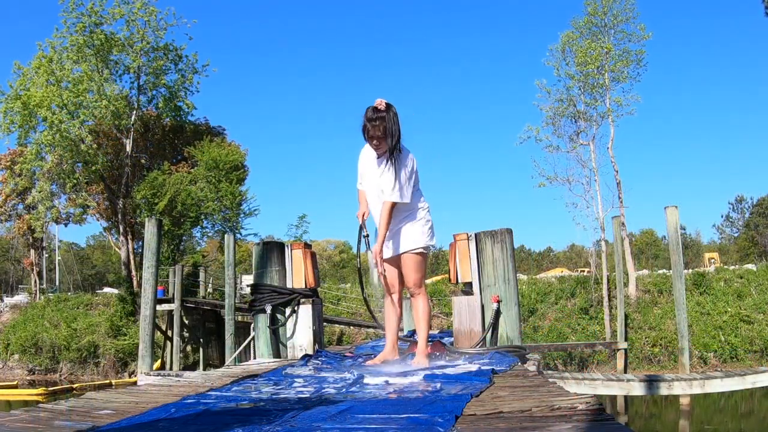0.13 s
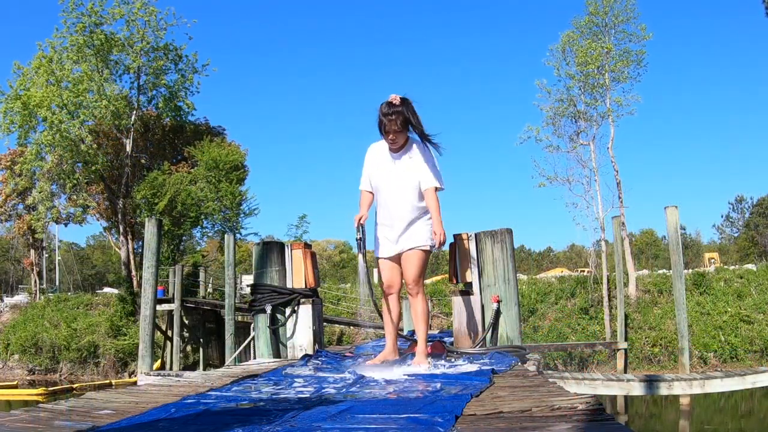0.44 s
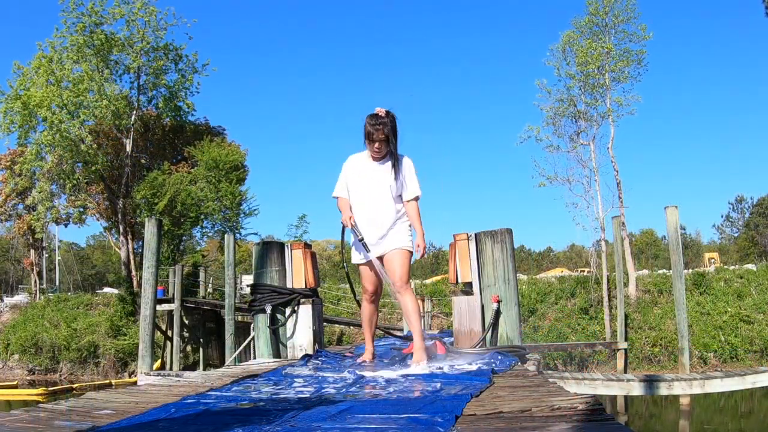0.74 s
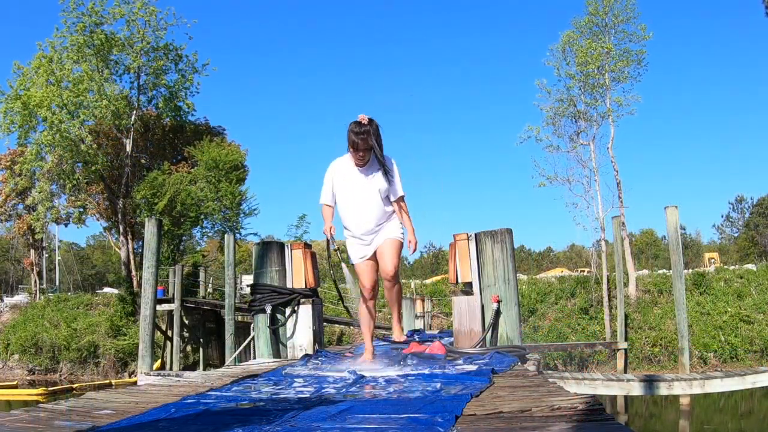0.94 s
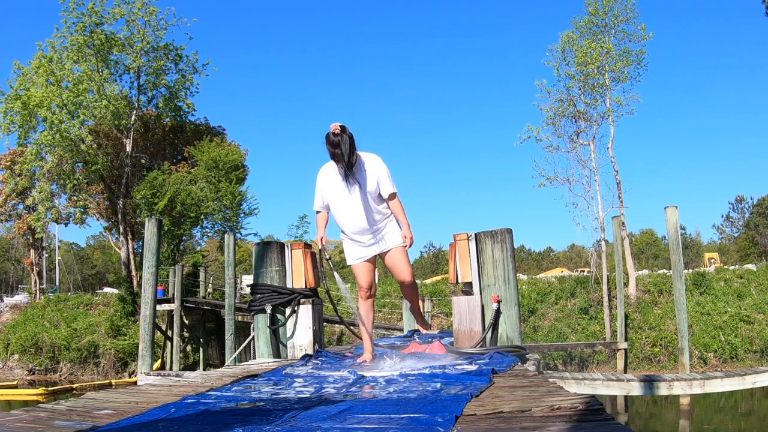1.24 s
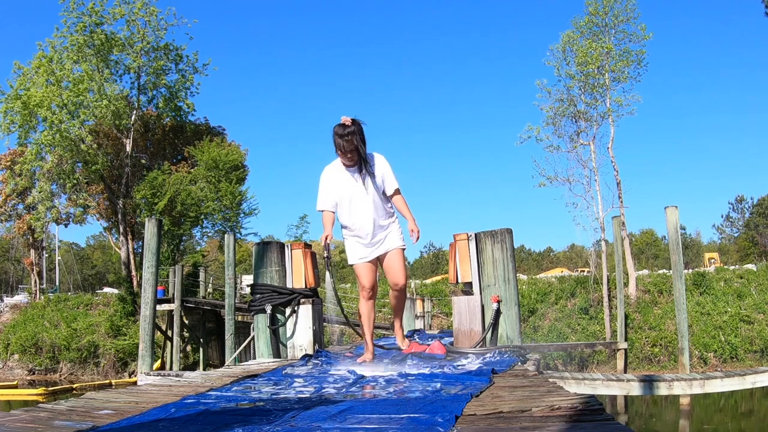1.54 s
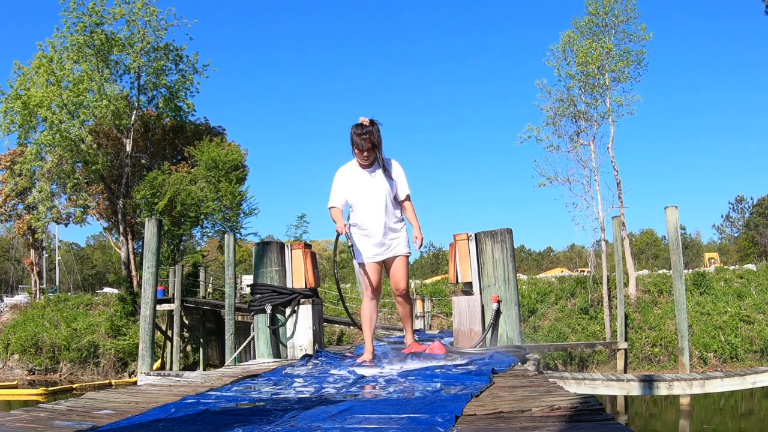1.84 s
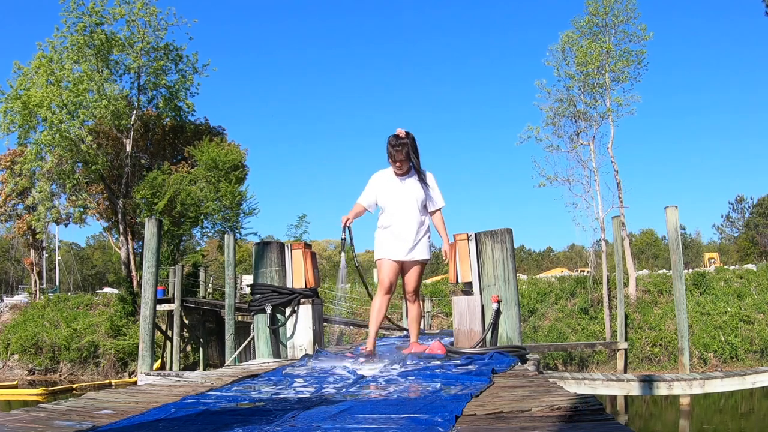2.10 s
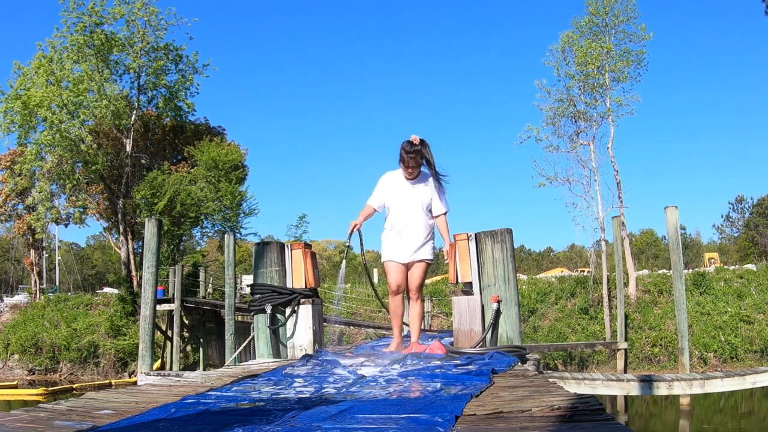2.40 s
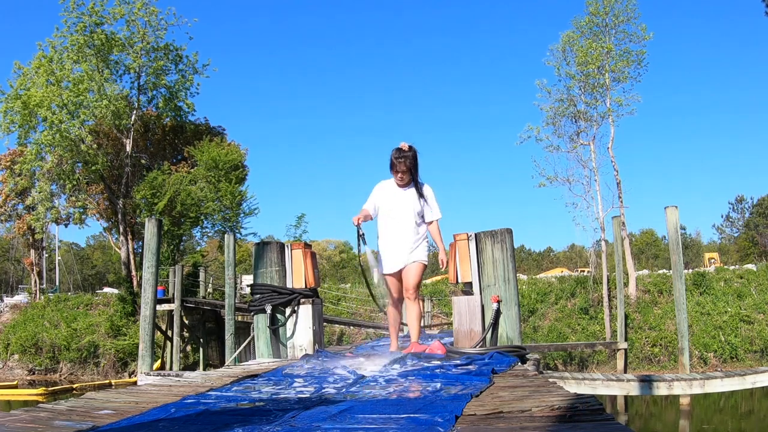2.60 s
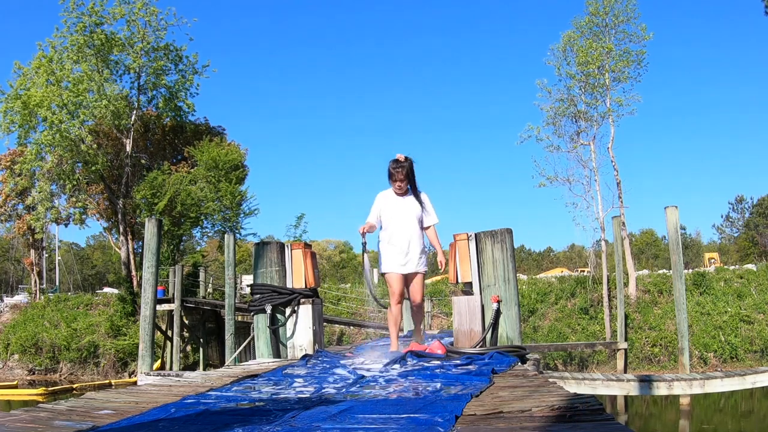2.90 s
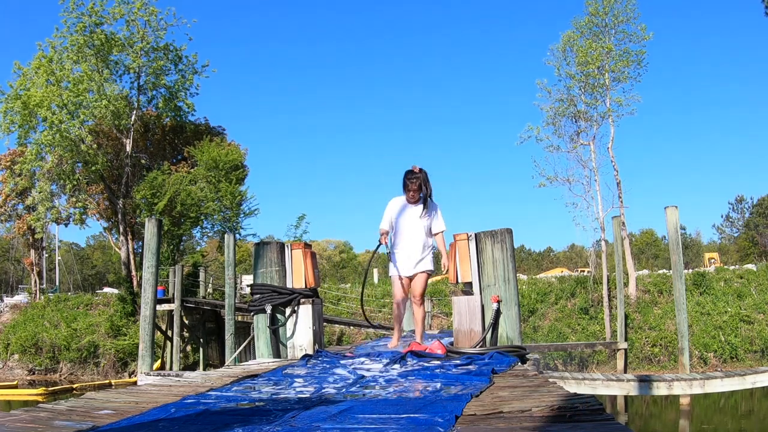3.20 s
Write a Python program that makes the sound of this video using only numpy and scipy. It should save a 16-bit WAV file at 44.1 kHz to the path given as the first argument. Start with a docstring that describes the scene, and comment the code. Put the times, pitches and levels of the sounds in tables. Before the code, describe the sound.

A hose nozzle sprays hard onto a plastic tarp on a wooden dock, a continuous bright, flickering hiss and patter sweeping about, with faint foot thuds and one sharp wet slap late; small stereo camera a few metres away.

```python
"""Hard spray from a hose nozzle sweeps a plastic tarp on a wooden dock: thousands of random drop hits,
split into bands that follow the sweep and flicker. Feet thud as low swelling tones; wet slaps and gurgles
ring a few cycles; a foot scuffs as band-limited noise. Light wind, slow-varying noise, buffets the ports.
Heard a few metres off through the two microphone ports of a small camera lying on the boards."""
import sys
import numpy as np
from scipy import signal
from scipy.fft import rfft, irfft
from scipy.io import wavfile
from scipy.ndimage import uniform_filter1d

SR = 44100
rng = np.random.default_rng(int(sys.argv[2]) if len(sys.argv) > 2 else 0)


def wav_out(sig):
    """Save sig, one row per channel (or a flat mono array), as 16-bit PCM at SR to the path in sys.argv[1]."""
    wavfile.write(sys.argv[1], SR, np.round(np.clip(np.atleast_2d(sig).T, -1, 1) * 32767).astype(np.int16))


N = 147735  # samples

# the sweeping spray, before its flicker: (time [s], patter level [dB],
# drumming against patter [dB], fine hiss against patter [dB])
SPRAY_SWEEP = [(0.0, -33, -6, -12), (0.02, -37, -3.5, -9), (0.04, -36, -4.5, -10), (0.21, -31.5, -12, -10),
               (0.28, -29.5, -16, -9.5), (0.32, -34.5, -13.5, -10), (0.43, -36.5, -9, -9),
               (0.46, -34.5, -13, -9), (0.5, -38.5, -11, -4), (0.512, -31.5, -13, -10),
               (0.57, -30.5, -15.5, -9.5), (0.62, -35, -8, -8), (0.64, -32, -11.5, -7.5),
               (0.69, -36.5, -5, -5), (0.72, -31.5, -13, -12), (0.76, -34.5, -5.5, -5),
               (0.77, -32.5, -17, -10), (0.81, -34, -7.5, -9), (0.83, -36.5, -12.5, -3),
               (0.97, -35, -7.5, -9), (1.0, -33.5, -8.5, -3.5), (1.045, -36, -9, -8), (1.075, -32, -12, -9),
               (1.13, -37, -11, -9.5), (1.2, -34, -8.5, -1), (1.23, -36.5, -6, -9), (1.275, -32, -9.5, -12),
               (1.3, -39, -11, -5), (1.32, -33.5, -12, -10), (1.35, -31.5, -9.5, -1),
               (1.39, -34.5, -2, -11), (1.42, -32.5, -13, -10), (1.51, -38.5, -3, -1), (1.55, -30, -13, -9),
               (1.65, -36, -11.5, -10), (1.69, -31.5, -9, -9), (1.73, -35.5, -8, -6.5),
               (1.88, -33.5, -10, -6.5), (1.91, -30, -4, -15), (1.95, -35.5, -10.5, -4),
               (1.98, -32, -9.5, -14), (2.0, -34, -9, -4), (2.09, -36, -8.5, -7), (2.12, -33, -10, -8.5),
               (2.18, -38.5, -10, -2.5), (2.2, -34, -6, -10), (2.24, -36.5, -11, -2.5),
               (2.34, -36.5, -5.5, -6.5), (2.43, -34.5, -11, -3), (2.49, -36.5, -3, -9),
               (2.54, -34.5, -11.5, -8), (2.58, -36, -9, -6), (2.68, -34.5, -11, -5.5),
               (2.73, -38.5, -5, -5.5), (2.81, -35, -4.5, -11), (2.88, -36, -3, -5),
               (2.98, -31.5, -8.5, -13), (3.01, -33.5, -7, -10), (3.045, -39, -4.5, -9),
               (3.065, -48, -13, -5), (3.095, -48.5, -6, -8), (3.125, -39, -8.5, -9), (3.16, -39, -8.5, -7),
               (3.21, -38.5, -5, -8.5), (3.26, -40.5, -2, -12), (3.29, -39, -10, -14), (3.31, -44, -3, -5),
               (3.35, -39.5, -10, -12)]
# low rush of water on sheet and boards, before it follows the sweep: (time [s], level [dB])
LOW_RUSH = [(0.0, -54), (1.5, -51.5), (1.83, -54), (2.06, -50), (2.57, -49.5), (2.99, -53.5), (3.15, -51),
            (3.35, -59)]
# tone of the spray through the camera housing and the boards under it: (frequency [Hz], density [dB per Hz])
SPRAY_COLOUR = [(88, -22), (150, -16), (172, -15.5), (222, -17), (272, -5.5), (330, -9), (413, -8.5),
                (502, -6.5), (699, -10.5), (816, -14), (1160, -7), (1780, -4), (2080, 0.5), (2630, -6),
                (3250, 0.5), (3880, -8.5), (4440, 1.5), (5300, -7), (6070, 0), (7090, -6.5), (7820, -0.5),
                (8450, -7.5), (12500, -10), (13500, -8), (14900, -13), (15800, -15.5)]
# spray that differs between the ports, against the shared spray: (frequency [Hz], level [dB])
PORT_DIFFERENCE = [(200, -12.5), (1800, -13.5), (2400, -3.5), (2900, -15.5), (3700, -2.5), (3900, -10),
                   (4600, -33), (5100, -31), (9800, -31), (11000, -6), (11700, -20), (12600, -5),
                   (13300, -2), (14000, -7), (14700, -13), (15600, -3)]
# gusts on the ports, level of the part common to both: (time [s], level [dB])
WIND_GUSTS = [(0.0, -73), (0.34, -61.5), (0.4, -55), (0.45, -78), (0.58, -69), (0.61, -55), (0.7, -55),
              (0.77, -80), (1.05, -61), (1.12, -81), (1.55, -72), (1.6, -58), (1.68, -56), (1.75, -84),
              (1.99, -76), (2.02, -45), (2.09, -75), (2.53, -73), (2.6, -57), (2.8, -91), (2.92, -62),
              (3.01, -48), (3.05, -75), (3.14, -67), (3.35, -86)]
# tone of the wind rumble: (frequency [Hz], density [dB per Hz])
WIND_COLOUR = [(20, -16), (40, -3), (70, 1), (120, 2), (170, -10), (400, -37)]
# feet on the boards: (start [s], peak level [dB], pitch [Hz], length [s])
FOOT_THUDS = [(0.668, -43, 62, 0.045), (2.015, -37.5, 171.3, 0.044), (2.515, -46.5, 240, 0.025),
              (2.563, -45, 201, 0.023), (2.586, -41, 190, 0.018), (2.94, -45, 60.3, 0.081)]
# wet slaps and gurgles on the sheet: (time of peak [s], peak level [dB], pitch [Hz], ring [cycles])
WET_SLAPS = [(.75, -45, 450, 2), (1.003, -44, 480, 2), (2.09, -44, 620, 3), (2.117, -42, 520, 5),
             (2.27, -41.5, 500, 7), (2.308, -40, 600, 2), (2.448, -42, 550, 2), (3.22, -33, 2380, 12),
             (2.6082, -22, 430, .45), (2.6126, -20, 800, .55)]
# resonances of the right port against the left: (frequency [Hz], width [Hz], level [dB])
RIGHT_RESONANCES = [(900, 1700, 1.5), (2200, 330, 2.5), (2470, 140, -3.5), (3270, 430, 4), (11130, 130, -8),
                    (13200, 3800, 1.5)]
# echo off the boards cancels or lifts the direct sound: (frequency [Hz], width [Hz], level [dB])
BOARD_ECHO = [(3360, 220, 1.5), (6780, 120, -3), (8320, 220, -8.5), (8780, 360, 3.5), (11250, 220, -10),
              (12620, 180, -7), (13950, 200, -5), (11600, 690, 1.5), (14500, 500, 1)]

DROPS_PER_S, DROP_SPREAD_DB = 32000, 1.24  # the spread is the mean of a random extra level
# spread of the random level walks: all bands together, each band at 2 kHz, quick flutter from 2 kHz up
SHARED_DB, OWN_DB, FLUTTER_DB = 0.5, 0.82, 1.95
OWN_TILT = -0.26  # power of pitch: a band's own walk is wider in the bass
RUSH_FOLLOWS = 0.3  # share of the drumming level's changes (in dB) added to the low rush
TOP_STEADY = 0.44  # share of the quick level changes that hiss above 11 kHz ignores
THUD_SIDE_DB = -11  # side part of a thud against its middle
SCUFF_START_S, SCUFF_END_S = 2.57, 2.613
SCUFF_DB, SCUFF_HZ = -33, (190, 1300)  # level at full rise; band
TOP_HZ = 15780  # cut-off of the steep low-pass [Hz]


def undb(db):
    """Turn decibels into an amplitude factor."""
    return 10 ** (np.asarray(db) / 20)


def curve(table, col):
    """Draw one column of a table sample by sample, in straight lines."""
    table = np.array(table)
    return np.interp(np.arange(N) / SR, table[:, 0], table[:, col])


def level(x):
    """Scale to an RMS of 1."""
    return x / np.sqrt(np.mean(x ** 2))


def colour(x, table):
    """Filter through a (frequency [Hz], level [dB]) table with a short causal, minimum-phase response."""
    table = np.array(table)
    hz = np.linspace(1, SR / 2, 2049)
    db = np.interp(np.log(hz), np.log(table[:, 0]), table[:, 1])
    cepstrum = irfft(db * np.log(10) / 20)
    # folding the cepstrum forward in time makes the response causal
    cepstrum[1:2048] *= 2
    cepstrum[2049:] = 0
    response = irfft(np.exp(rfft(cepstrum)))
    return signal.fftconvolve(x, response)[:N]


def walk(rate):
    """Wander between random levels held 1 / rate seconds and smoothed twice; RMS 1."""
    hold = int(SR / rate)
    steps = np.repeat(rng.standard_normal(N // hold + 1), hold)
    smooth = uniform_filter1d(uniform_filter1d(steps, hold), hold)
    return level(smooth[:N])


def bands(x, edges):
    """Split a sound into overlapping bands that sum to it."""
    spectrum = rfft(x)
    log_hz = np.log(np.arange(N // 2 + 1) * SR / N + 1)
    return [irfft(spectrum * np.interp(log_hz, np.log(edges), row), N) for row in np.eye(len(edges))]


def drops():
    """Drops of uneven size land at random moments, each a one-sample hit."""
    hit = rng.random(N) < DROPS_PER_S / SR
    size = undb(DROP_SPREAD_DB * rng.exponential(size=N))
    return hit * rng.standard_normal(N) * size


def spray():
    """Drop patter, shared and port-only, whose bands follow the sweep and each flicker on their own."""
    hz = 250 * 2 ** (np.arange(31) / 5)  # band centres, five to the octave
    group = np.digitize(hz, [1050, 2600, 8400])  # rush, drumming, patter, fine hiss
    shared = colour(drops(), SPRAY_COLOUR)
    apart = colour(colour(drops(), SPRAY_COLOUR), PORT_DIFFERENCE)
    shared_bands = np.array(bands(shared, hz))
    apart_bands = np.array(bands(apart, hz))

    patter = curve(SPRAY_SWEEP, 1)
    drumming = patter + curve(SPRAY_SWEEP, 2)
    hiss = patter + curve(SPRAY_SWEEP, 3)
    rush = curve(LOW_RUSH, 1) + RUSH_FOLLOWS * (drumming - np.mean(drumming))
    group_db = [rush, drumming, patter, hiss]
    scale = [np.std(shared_bands[group == g].sum(axis=0)) for g in range(4)]

    common, out = SHARED_DB * walk(11), 0
    for k, g in enumerate(group):
        slow_db = uniform_filter1d(group_db[g], SR // 4)
        steady = TOP_STEADY * (hz[k] > 11000) * (slow_db - group_db[g])
        own = OWN_DB * (hz[k] / 2000) ** OWN_TILT * walk(14)
        flutter = FLUTTER_DB * min(hz[k] / 2000, 1) * walk(90)
        gain = undb(group_db[g] + steady + common + own + flutter) / scale[g]
        left = shared_bands[k] + apart_bands[k]
        right = shared_bands[k] - apart_bands[k]
        out = out + gain * np.array([left, right])
    return signal.sosfilt(signal.butter(2, 80, "high", fs=SR, output="sos"), out)


def wind():
    """Air buffets the ports as a low gusty noise rumble, partly different at each."""
    mid = level(colour(rng.standard_normal(N), WIND_COLOUR))
    side = level(colour(rng.standard_normal(N), WIND_COLOUR))
    return np.array([mid + 0.6 * side, mid - 0.6 * side]) * undb(curve(WIND_GUSTS, 1))


def thuds():
    """Feet on the boards: low tones swell and fade over half a sine, a little stronger at the right port."""
    out, t = np.zeros((2, N)), np.arange(N) / SR
    for start, db, hz, length in FOOT_THUDS:
        progress = np.clip((t - start) / length, 0, 1)
        tone = undb(db) * np.sin(np.pi * progress) * np.sin(2 * np.pi * hz * (t - start))
        out += tone * (1 + undb(THUD_SIDE_DB) * np.array([[-1], [1]]))
    return out


def slaps():
    """Wet sheet slaps and gurgles: tones under a bell-shaped swell, equal on both sides."""
    out, t = np.zeros((2, N)), np.arange(N) / SR
    for peak, db, hz, ring in WET_SLAPS:
        cycles = (t - peak) * hz
        out += undb(db) * np.cos(2 * np.pi * cycles) * np.exp(-(cycles / ring) ** 2)
    return out


def scuff():
    """A foot scuffs the sheet into the loudest slap: band-limited noise rises, then stops short."""
    band = signal.butter(3, SCUFF_HZ, "band", fs=SR, output="sos")
    rub = level(signal.sosfilt(band, rng.standard_normal(N)))
    rise = (np.arange(N) / SR - SCUFF_START_S) / (SCUFF_END_S - SCUFF_START_S)
    fade = np.clip((1 - rise) * 20, 0, 1)  # over the last twentieth
    return undb(SCUFF_DB) * rub * np.clip(rise, 0, 1) * fade


def scene():
    """Sum the spray, the wind and the feet on the dock as left and right sound."""
    return spray() + wind() + thuds() + slaps() + scuff()


def resonance_curve(rows, hz):
    """Add bell-shaped peaks and dips in decibels over frequency."""
    return sum(db * np.exp(-((hz - centre) / width) ** 2 * 2) for centre, width, db in rows)


def record(dry):
    """The board echo colours both sides; one port-difference curve is split between them; the top is cut."""
    hz = np.geomspace(50, 20000, 900)
    right_db = resonance_curve(RIGHT_RESONANCES, hz)
    echo_db = resonance_curve(BOARD_ECHO, hz)
    # half of the port difference is taken from the left, half added to the right
    left = colour(dry[0], np.c_[hz, echo_db - right_db / 2])
    right = colour(dry[1], np.c_[hz, echo_db + right_db / 2])
    return signal.sosfilt(signal.ellip(16, .3, 70, TOP_HZ, fs=SR, output="sos"), [left, right])


dry = scene()
out = record(dry)
wav_out(out)
```